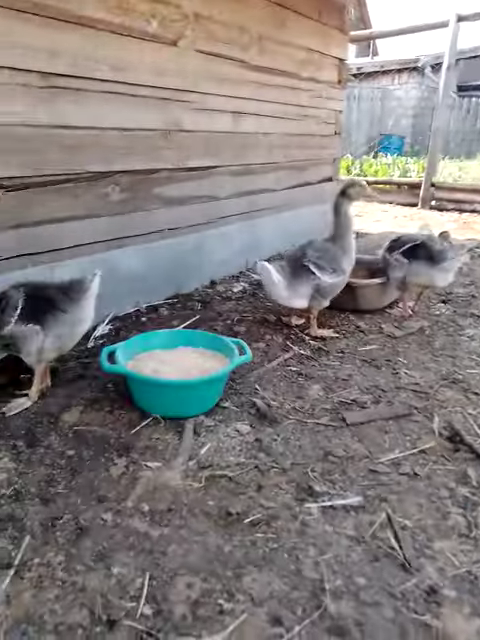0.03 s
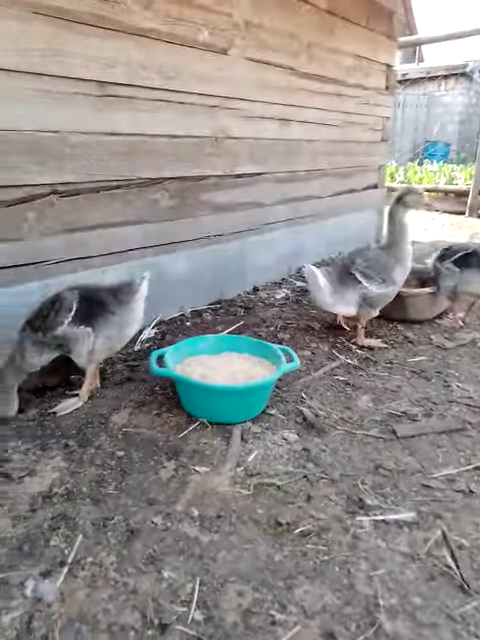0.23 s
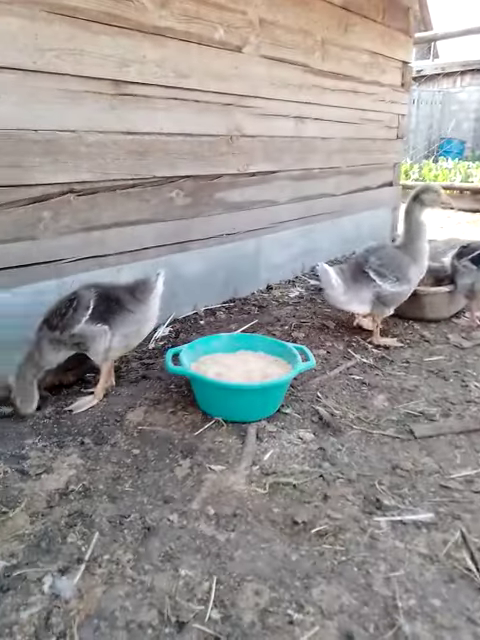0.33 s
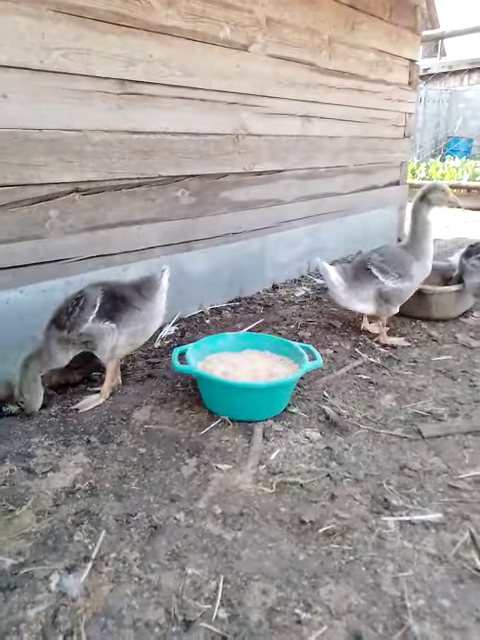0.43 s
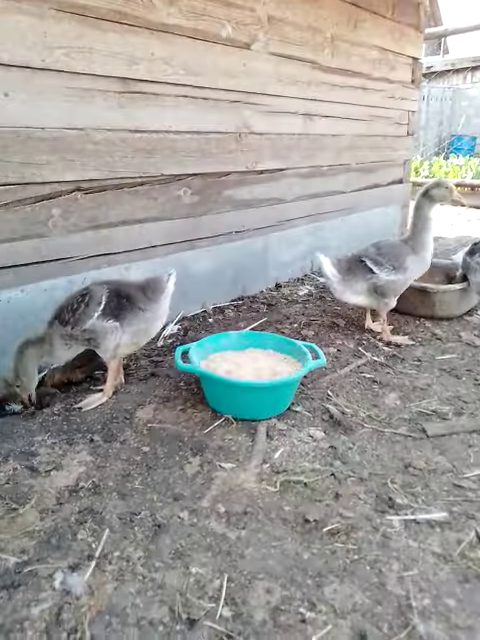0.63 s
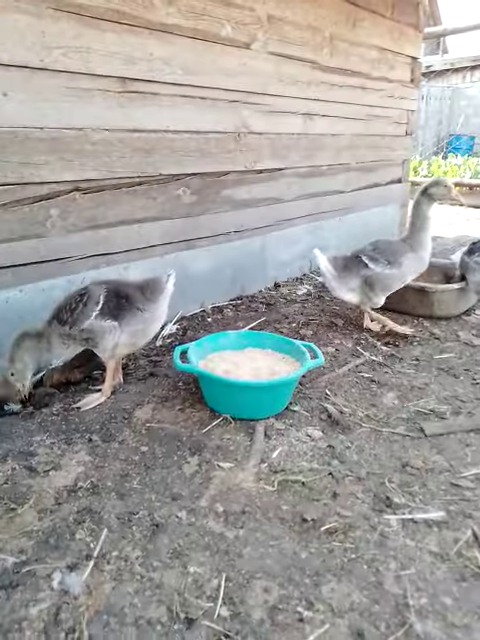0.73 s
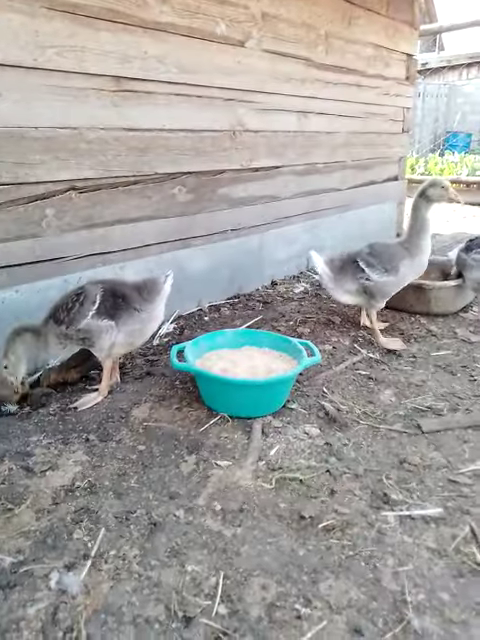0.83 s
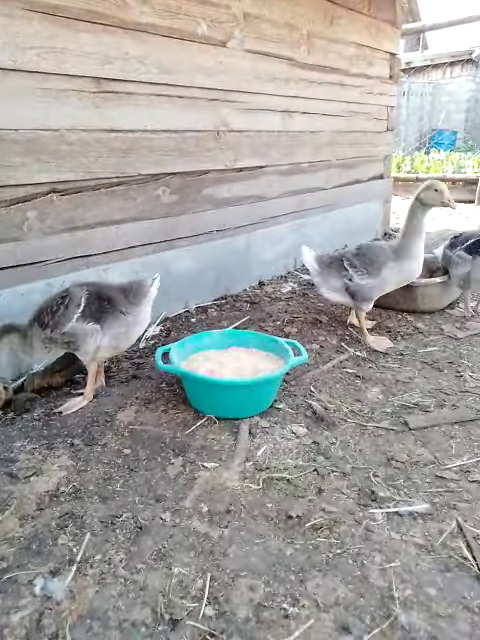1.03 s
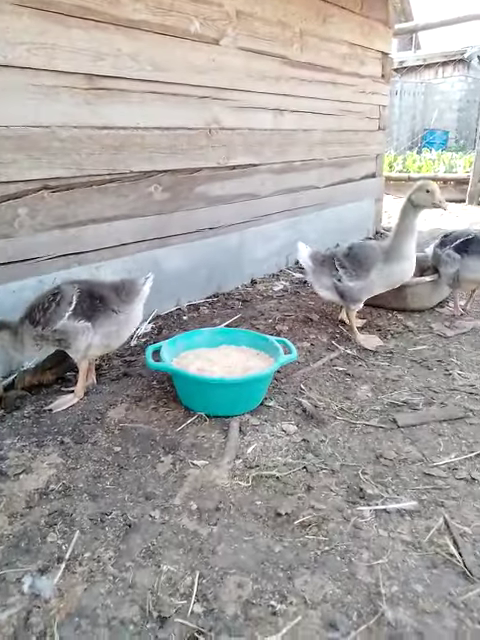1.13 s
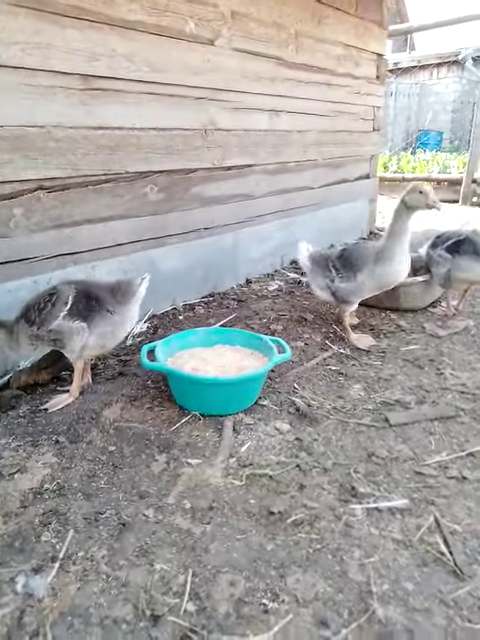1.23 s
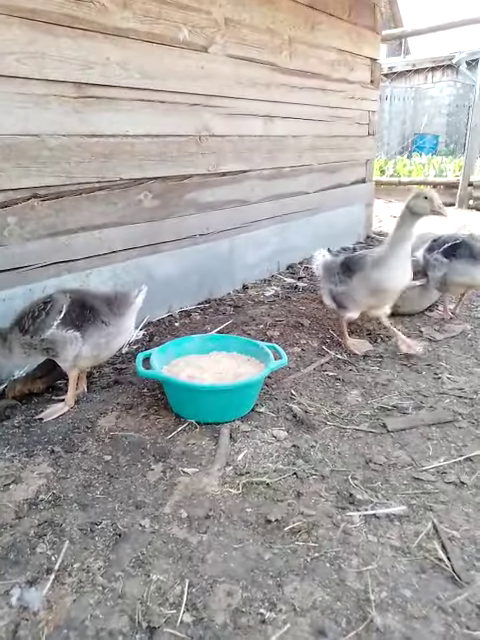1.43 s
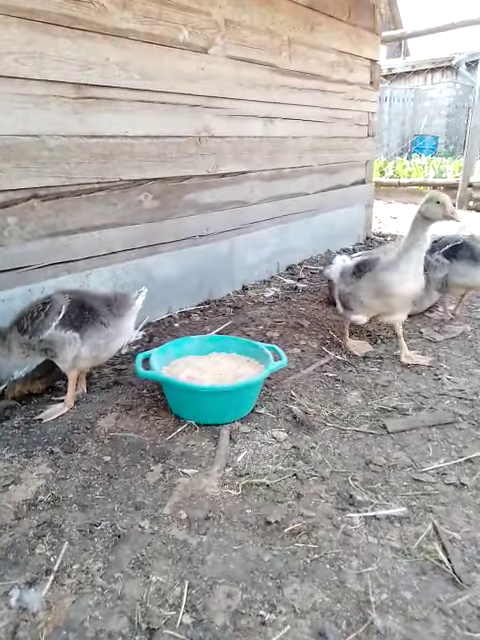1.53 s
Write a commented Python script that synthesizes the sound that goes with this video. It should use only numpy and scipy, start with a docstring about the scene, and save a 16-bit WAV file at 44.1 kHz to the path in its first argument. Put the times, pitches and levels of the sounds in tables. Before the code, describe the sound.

Several goslings peep in short, high, gliding whistles, one clear and close; after a brief lull, bill clicks, two cracking squawks and a hoarse fading hiss, in a quiet open yard with slight wind rumble on the microphone.

```python
"""Goslings beside a plank shed

Goslings peep in a farmyard, thin overlapping whistles on gliding pitches, one of them close by.
A bill clicks, as decaying modes with a noise crack; a young goose squawks twice in a breaking voice of
harmonics, over and into a hoarse hiss of noise in throat resonances. Delayed copies and a short noise
tail answer from wall and yard; light air rumbles on the microphone as low coloured noise."""
import sys
import numpy as np
from scipy import signal
from scipy.fft import rfft, irfft, next_fast_len
from scipy.io import wavfile
from scipy.ndimage import uniform_filter1d, map_coordinates

SR = 44100
rng = np.random.default_rng(int(sys.argv[2]) if len(sys.argv) > 2 else 0)


def wav_record(signal):
    """Record a signal, one row per channel, as 16-bit PCM in the file named by sys.argv[1]."""
    frames = np.transpose(np.atleast_2d(signal))
    bounded = np.clip(frames, -1, 1)
    # unit amplitude maps onto the largest positive 16-bit level
    quanta = np.round(bounded * 32767).astype(np.int16)
    wavfile.write(sys.argv[1], SR, quanta)


N = 70560

# How the throat colours the overtones of a whistle against its fundamental.
# Each row: frequency in Hz, level in dB.
WHISTLE_COLOUR = [(2800, -13), (3200, -15), (3500, -18), (3750, -29.5), (4000, -48), (4350, -58),
                  (4800, -30.5), (5350, -19), (5900, -40.5), (6400, -48.5), (7000, -45), (7600, -75.5),
                  (9000, -76)]


def flock():
    """Each peep scoops up to a shoulder pitch, leaps to its crest and glides to its last pitch."""
    # The peeps of the flock. Each row: start, crest and end in seconds, shoulder, crest and last pitch
    # in Hz, level in dB, level at the crest in dB, overtones in dB, roughness from 0 to 1.
    peeps = [(-.03, 0.02, 0.046, 1637, 1722, 1790, -52, -58.5, -15, 0.31),
             (0.022, 0.035, 0.045, 1375, 1438, 1380, -63, -51, -14, 0.14),
             (0.079, 0.11, 0.19, 1551, 1606, 1436, -53, -60, 8, 0.37),
             (0.1, .135, 0.16, 1684, 1694, 1900, -50.5, -51.5, -4.5, 0.03),
             (0.131, 0.16, 0.18, 1447, 1430, 1470, -54.5, -53.5, -24, 0.4),
             (0.212, 0.223, 0.24, 1330, 1356, 1420, -66, -57.5, -26.5, 0.34),
             (0.281, 0.305, .31, 1430, 1394, 1305, -53, -54, 3, 0.42),
             (0.316, 0.331, .358, 2360, 2462, 2274, -52, -56.5, -15.5, 0.61),
             (0.402, 0.442, 0.46, 1683, 2140, 2030, -57.5, -51.5, 0.5, 0.52),
             (.45, 0.474, 0.55, 2376, 2204, 2024, -53, -50.5, -13, 0.6),
             (0.471, 0.502, 0.5213, 1654, 1750, 1734, -55, -40, -10.5, 0.24),
             (0.476, 0.514, 0.54, 2120, 2192, 1635, -51.5, -50, -15, 0.43),
             (0.506, 0.53, 0.54, 2188, 2610, 1950, -42.5, -51.5, 2, 0.37),
             (.524, 0.547, .566, 1529, 1900, 1880, -50, -48, -3, 0.4),
             (0.547, 0.565, 0.6, 2167, 2197, 2350, -42.5, -45, -3, 0.17),
             (0.568, .596, .618, 2417, 2480, 2210, -54, -49.5, 0, 0.71),
             (0.576, 0.59, .614, 2910, 2960, 2860, -72, -60.5, -17, 0.5),
             (0.594, 0.614, 0.62, 2144, 1880, 1720, -49.5, -52, -3, 0.65),
             (0.676, 0.728, 0.76, 1750, 2511, 1808, -44.5, -51, 0, 0.16),
             (0.704, 0.73, 0.72, 2242, 2625, 2420, -46.5, -45, -3, 0.53),
             (0.698, .744, 0.759, 1850, 2013, 1820, -55, -47, -16, 0.71)]
    # The throat colour of the flock's overtones. Each row: frequency in Hz, level in dB.
    flock_colour = [(2800, -15.5), (3200, -9.5), (3600, -17), (4000, -19), (4600, -31.5), (5200, -33),
                    (5800, -34.5), (6300, -37.5), (6800, -54), (9000, -62)]
    leap_s, shoulder_s = 0.01092, 0.0286  # half width of the leap; lead of the shoulder on the crest
    onset_db, fade_db = -15.5, -24  # first level against the shoulder, last level against the crest
    scoop = 0.89  # first pitch over shoulder pitch
    out = np.zeros(N)
    for start, crest, end, shoulder_hz, crest_hz, last_hz, db, crest_db, overtones_db, rough in peeps:
        i, t, gate = span(start, end)
        shoulder = max(crest - shoulder_s, (start + crest) / 2)
        glide_hz = [scoop * shoulder_hz, shoulder_hz, shoulder_hz, last_hz]
        glide = np.interp(t, [start, shoulder, crest, end], glide_hz)
        leap = np.exp(-((t - crest) / leap_s) ** 2)
        hz = glide + (crest_hz - shoulder_hz) * leap
        level_s = [start, shoulder, crest, (crest + end) / 2, end]
        level_db = np.interp(t, level_s, [db + onset_db, db, crest_db, crest_db, crest_db + fade_db])
        partials = overtones(hz, flock_colour, overtones_db)
        out[i] += gate * amp(level_db) * voice(hz, partials, rough)
    return out


def close_peep():
    """One clean whistle near the microphone, whose second harmonic fades steadily as it goes on."""
    # The course of the close peep. Each row: time in seconds, pitch in Hz, level in dB.
    close_course = [(.222, 1502, -70.5), (.243, 1660, -40.5), (.266, 1786, -36.5), (.278, 2054, -29),
                    (.290, 2168, -31.5), (.304, 1976, -25), (.316, 1724, -34), (.329, 1638, -37),
                    (.338, 1539, -42.5), (.362, 1394, -69)]
    mellow_db_per_s, mellow_from_s = 160.5, 0.31  # the fade is 0 dB at mellow_from_s

    def partials(t, hz):
        mellow_db = mellow_db_per_s * (t - mellow_from_s)
        return [(k, db - (k == 2) * mellow_db) for k, db in overtones(hz, WHISTLE_COLOUR, db=1)]

    return call(close_course, partials, rough=0.027)


def squawks():
    """Two reedy calls; the first cracks into a whistle, the second thins to its second harmonic."""
    # The two squawks, a list of rows for each. Each row: time in seconds, pitch in Hz, level in dB.
    squawk_courses = [
        [(1.092, 823.5, -74), (1.111, 812, -41), (1.122, 769, -45), (1.139, 786, -55), (1.152, 746, -50)],
        [(1.250, 766, -44), (1.258, 776.3, -49), (1.266, 827, -43.5), (1.279, 884.4, -32.5), (1.298, 912, -36),
         (1.309, 919, -28), (1.320, 924, -62.5)],
    ]
    # The harmonics of the reedy voice. Each row: multiple of the pitch, level in the first squawk in dB,
    # level in the second in dB.
    harmonic_levels = [(1, -0.5, -12), (2, -7.5, -5.5), (3, -1, -15), (4, -3, -16.5), (5, -12, -46),
                       (6, -17, -37.5), (7, -57, -53)]
    # The whistle that the first squawk cracks into. Each row: time in seconds, pitch in Hz, level in dB.
    crack = [(1.074, 1355, -79), (1.086, 1502, -49), (1.098, 1584, -66.5), (1.116, 1538, -47.5),
             (1.124, 1505, -29.5), (1.138, 1453, -46), (1.152, 1503, -50), (1.161, 1500, -59.5)]
    flicker_db, flicker_rate = 2.5, 270  # each harmonic wavers on its own (dB, knots per s)
    pure_from_s, pure_db_per_s = 1.295, 600  # fade of all but the second harmonic

    def harmonics(t, levels):
        fade_db = pure_db_per_s * np.maximum(t - pure_from_s, 0)
        partials = []
        for k, db in enumerate(levels, 1):
            flicker = flicker_db * wobble(flicker_rate, len(t))
            partials.append((k, db - (k != 2) * fade_db + flicker))
        return partials

    _, *levels = np.transpose(harmonic_levels)
    reedy = np.zeros(N)
    for rows, db in zip(squawk_courses, levels):
        reedy += call(rows, lambda t, hz: harmonics(t, db), rough=0.19)
    whistle = call(crack, lambda t, hz: overtones(hz, WHISTLE_COLOUR, db=-11), rough=0.07)
    return reedy + whistle


def hiss(drift=0.01176, drift_rate=24, rasp_db=1.37, rasp_rate=130):
    """The goose forces air through throat resonances that drift as its bill opens; the flow rasps."""
    # The strength of the hiss. Each row: time in seconds, level in dB.
    strength = [(1.085, -109), (1.115, -51), (1.16, -58.5), (1.21, -52.5), (1.25, -53), (1.30, -48),
                (1.335, -51.5), (1.39, -52), (1.47, -56), (1.53, -55.5), (1.6, -65)]
    # The times of the early, middle and late throat, in seconds.
    state_times = (1.15, 1.4, 1.6)
    # Throat resonances. Each row: early, middle and late frequency in Hz, half width in Hz,
    # early, middle and late level in dB.
    throat_modes = [(760, 780, 1400, 167, -13.5, -13, -23), (1221, 1190, 1175, 58, -36, -10, -3.5),
                    (1562, 1560, 2000, 260, -0.5, -8, -8.5), (1967, 2030, 1920, 68, -9.5, -10.5, -6),
                    (2550, 2480, 2680, 83, -6.5, -14, -4), (3134, 3460, 3380, 310, 4, -1, -1.5),
                    (4370, 3880, 3820, 390, -14, -5.5, -11.5)]
    # The colour of the broad rush of air. Each row: frequency in Hz, relative level in dB.
    rush_colour = [(200, -43), (350, -1), (550, -14), (1000, -10.5), (1600, 4.5), (3200, -1.5),
                   (4400, -10.5), (5000, -10.5), (5600, -33.5), (9000, -47.5), (14000, -50)]

    def state(values):
        return np.interp(clock(), state_times, values)

    throat = np.zeros(N)
    for *state_hz, width_hz, early_db, middle_db, late_db in throat_modes:
        hz = state(state_hz) * (1 + drift * wobble(drift_rate, N))
        throat += amp(state([early_db, middle_db, late_db])) * resonance(hz, width_hz)
    rush = amp(-5.5) * noise(rush_colour)
    strength_db, = curves(strength)
    return amp(strength_db + rasp_db * wobble(rasp_rate, N)) * (throat + rush)


def clicks(attack_s=0.00077, snap_db=-15, snap_t60=0.002):
    """The bill snaps shut: a tiny noise crack and a few quickly dying modes."""
    # The clicks. Each row: time in seconds, level in dB, brightness in dB per two octaves,
    # share of the full ring time (which shortens attack and crack alike).
    snaps = [(.96, -44, 6, 0.44), (0.986, -66.5, 16.5, 0.405), (1.037, -48, 10, 0.26),
             (1.0544, -58, 17.5, 0.18), (1.0987, -50.5, 2.5, .6), (1.1098, -23, -12.5, 0.53),
             (1.1394, -32.5, -33, 0.95)]
    # Modes of the bill. Each row: frequency in Hz, level in dB, full time to fall by 60 dB in seconds.
    bill_modes = [(1900, -5, 0.0042), (2960, -1, 0.014), (3080, 1, 0.0088), (4180, 1, 0.014),
                  (6730, -5.5, 0.008), (7150, -14, 0.019), (9160, -13.5, 0.007), (12920, -28.5, 0.0039)]
    snap_grows = 1.54  # dB of crack per dB of brightness
    pivot_hz = bill_modes[1][0]  # brightness leaves this mode's level alone
    out, t = np.zeros(N), np.arange(SR // 20) / SR
    for s, db, bright_db, length in snaps:
        age = t / length
        ring = np.zeros(len(t))
        for hz, level, t60 in bill_modes:
            tilt_db = bright_db * np.log2(hz / pivot_hz) / 2
            ring += amp(level + tilt_db - 60 * age / t60) * np.sin(2 * np.pi * hz * t)
        attack = 1 - np.exp(-(age / attack_s) ** 2)
        crack_db = snap_db + snap_grows * bright_db - 60 * age / snap_t60
        crack = amp(crack_db) * rng.standard_normal(len(t))
        out[round(s * SR):][:len(t)] += amp(db) * (attack * ring + crack)
    return out


def background():
    """Coloured noise for quiet yard air and a breeze on the microphone, noise bursts for small sounds."""
    # Scuffs, faint distant chirps and a short low noise near the second squawk. Each row: middle in seconds,
    # half length in seconds, frequency in Hz, half width in Hz, level in dB.
    small_bursts = [(0.006, 0.074, 3470, 1050, -65.5), (0.047, 0.11, 373, 138, -74),
                    (1.259, 0.0072, 609.5, 99, -59.5), (0.396, 0.0067, 344, 270, -66.5),
                    (0.8, 0.013, 3660, 340, -63.5), (0.882, 0.014, 3490, 494, -63.5),
                    (0.933, 0.01, 4160, 816, -69.5)]
    # The colour of the yard air. Each row: frequency in Hz, relative level in dB.
    air_colour = [(76, -47), (130, -22), (149, -17), (263, -2.5), (382, -2.5), (728, -8), (803, -5),
                  (977, -8.5), (1100, -10), (3770, -3.5), (5470, -18.5), (11500, -23.5), (14000, -25)]
    # The strength of the breeze. Each row: time in seconds, level in dB.
    breeze = [(0, -55), (.07, -55), (.2, -65), (.29, -62), (.325, -49), (.38, -65.5), (.8, -69.5),
              (1.1, -70.5), (1.6, -69.5)]
    # The colour of the breeze on the microphone. Each row: frequency in Hz, relative level in dB.
    rumble_colour = [(15, 6), (35, -5), (70, -8.5), (110, -18.5), (170, -45), (400, -79)]
    small_sounds = np.zeros(N)
    for s, length, hz, width_hz, db in small_bursts:
        swell = np.exp(-((clock() - s) / length) ** 2)
        small_sounds += amp(db) * swell * resonance(hz, width_hz)
    wind_db, = curves(breeze)
    return amp(-71.5) * noise(air_colour) + amp(wind_db) * noise(rumble_colour) + small_sounds


def scattered(x, scatter_db=-6, t60=0.03):
    """Planks, bowls and ground smear a farther call with a brief burst of dying noise."""
    burst = rng.standard_normal(N) * amp(-60 * clock() / t60)
    return x + amp(scatter_db) * signal.fftconvolve(x, burst / np.linalg.norm(burst))[:N]


def yard(x, wet_db, build_s=0.044):
    """Ground and walls return a few delayed copies and a short diffuse tail that builds and dies."""
    # Copies from ground and walls. Each row: delay in seconds, level in dB.
    walls = [(.0065, -13.5), (0.0147, -20), (0.019, -21.5), (.044, -22.5), (0.057, -31.5)]
    tail_t60_s, tail_db = 0.13, -13.5
    t = clock()
    tail = rng.standard_normal(N) * amp(-60 * t / tail_t60_s) * (1 - np.exp(-t / build_s))
    early = filtered(x, lambda f: sum(amp(db) * np.exp(-2j * np.pi * f * s) for s, db in walls))
    diffuse = amp(tail_db) * signal.fftconvolve(x, tail / np.linalg.norm(tail))[:N]
    return x + amp(wet_db) * (early + diffuse)


def voice(hz, partials, rough, jitter=0.035, flutter_rate=260):
    """The syrinx: partials (multiple, dB) on one pitch that flutters in frequency and strength."""
    pitch = uniform_filter1d(hz, size=180) * (1 + jitter * rough * wobble(flutter_rate, len(hz)))
    phase = 2 * np.pi * np.cumsum(pitch) / SR
    strength = 1 + rough * wobble(flutter_rate, len(hz))
    return np.sqrt(2) * strength * sum(amp(db) * np.sin(k * phase) for k, db in partials)


def overtones(hz, colour, db, count=3):
    """The fundamental, a trifle flat, and overtones that sweep through the throat's resonances."""
    fundamental = (0.99, 0.012)  # multiple, dB
    return [fundamental] + [(k, db + along(colour, k * hz)) for k in range(2, count + 2)]


def call(rows, partials, rough):
    """One call on a curve of pitch and level; partials is a rule of time and pitch."""
    i, t, gate = span(rows[0][0], rows[-1][0])
    hz, db = [c[i] for c in curves(rows)]
    return np.bincount(i, gate * amp(db) * voice(hz, partials(t, hz), rough), N)


def span(start, end, edge_s=0.0027):
    """The samples between two times, their times and a gate with soft edges."""
    i = np.arange(max(int(start * SR), 0), min(int(end * SR), N))
    t = i / SR
    from_edge = np.minimum(t - start, end - t)
    return i, t, np.sin(np.pi / 2 * np.clip(from_edge / edge_s, 0, 1)) ** 2


def resonance(hz, width_hz):
    """Noise of rms 1 in one resonance, a slow random envelope and phase on a tone that may move."""
    white = rng.standard_normal(N) + 1j * rng.standard_normal(N)
    slow = np.fft.ifft(white / (1 + (np.fft.fftfreq(N, 1 / SR) / width_hz) ** 2) ** 2)
    return unit(np.abs(slow) * np.cos(turns(hz) + np.angle(slow)))


def noise(spectrum):
    """Noise of rms 1, coloured by (Hz, dB) points."""
    return unit(filtered(rng.standard_normal(N), lambda f: amp(along(spectrum, f))))


def filtered(x, response):
    """x times a response of frequency, padded so that delays do not wrap round."""
    m = next_fast_len(N + SR // 2)
    return irfft(rfft(x, m) * response(np.fft.rfftfreq(m, 1 / SR)), m)[:N]


def wobble(rate, size):
    """A smooth random curve, rate knots a second."""
    return map_coordinates(rng.standard_normal(512), [np.arange(size) * rate / SR], mode="wrap")


def turns(hz):
    """Running phase in radians of a moving frequency."""
    return 2 * np.pi * np.cumsum(hz * np.ones(N)) / SR


def curves(rows):
    """One value per sample for each column after the time."""
    s, *cols = np.transpose(rows)
    return [np.interp(clock(), s, c) for c in cols]


def along(points, hz):
    """(Hz, value) points read on a log axis."""
    f, v = np.transpose(points)
    return np.interp(np.log(hz + 1), np.log(f + 1), v)


def clock():
    """The time of each sample in seconds."""
    return np.arange(N) / SR


def amp(db):
    """Decibels to gain."""
    return 10 ** (np.asarray(db) / 20)


def unit(x):
    """Scale to rms 1."""
    return x / np.sqrt(np.mean(x ** 2) + 1e-20)


def scene():
    """The yard answers calls and clicks, the flock is smeared as well, and the hiss is heard direct."""
    birds = yard(scattered(flock()), wet_db=-3.5)
    birds += yard(close_peep(), wet_db=-3)
    birds += yard(squawks(), wet_db=-2.5)
    return (birds + hiss() + yard(clicks(), wet_db=-16.5) + background())[None]


def record(dry):
    """The recorder keeps nothing above its band limit."""
    top_hz = 14300
    return filtered(dry[0], lambda hz: hz < top_hz)[None]


dry = scene()
out = record(dry)
wav_record(out)
```